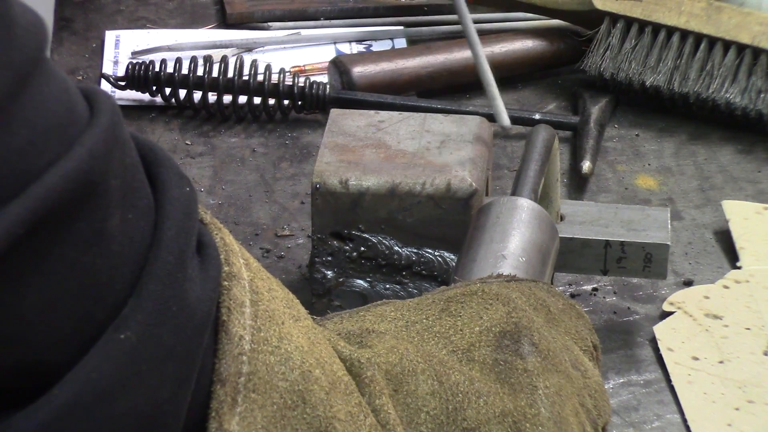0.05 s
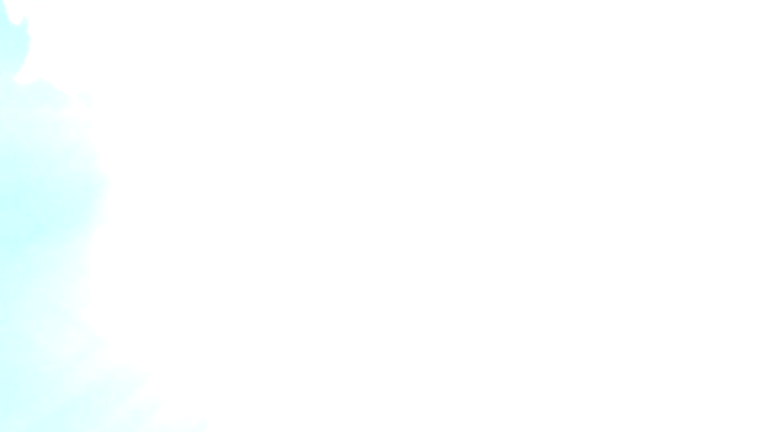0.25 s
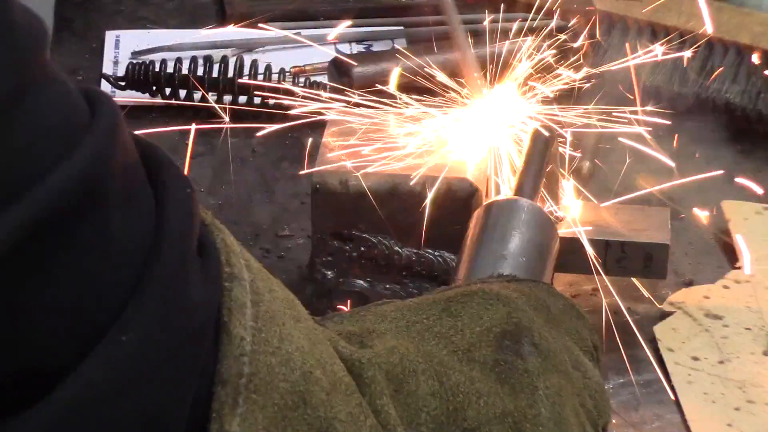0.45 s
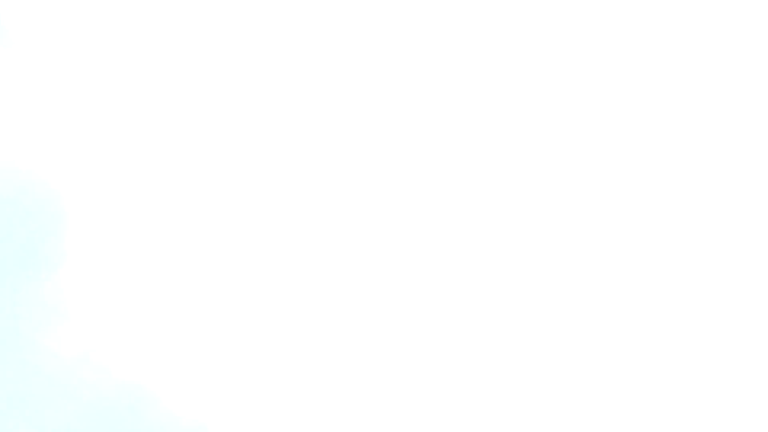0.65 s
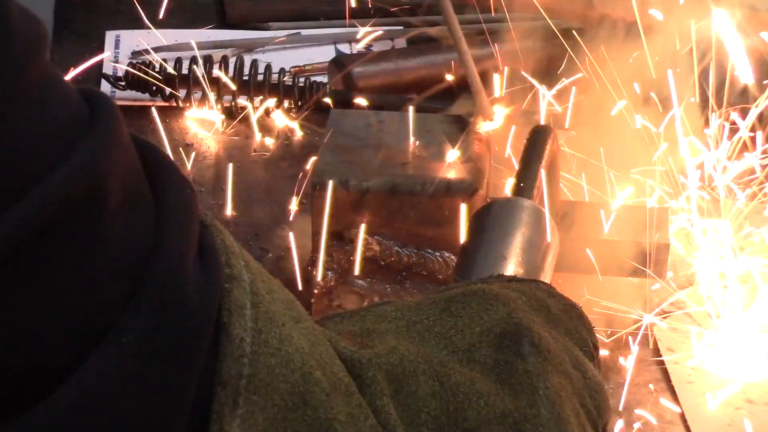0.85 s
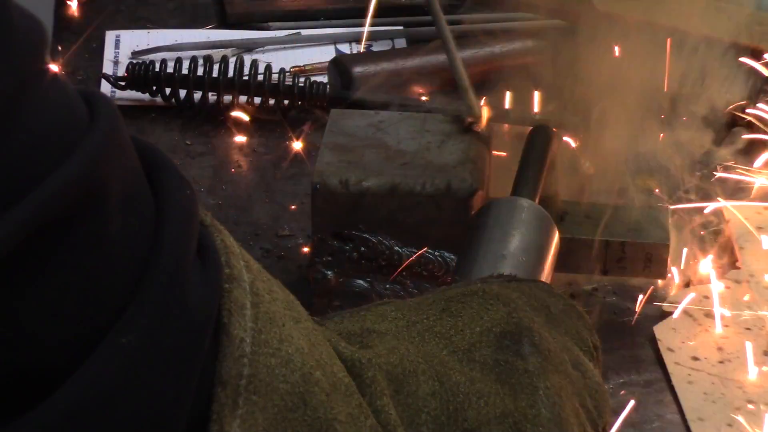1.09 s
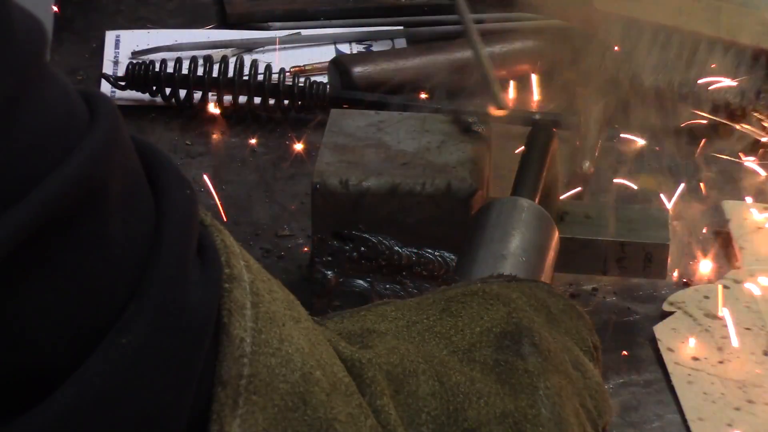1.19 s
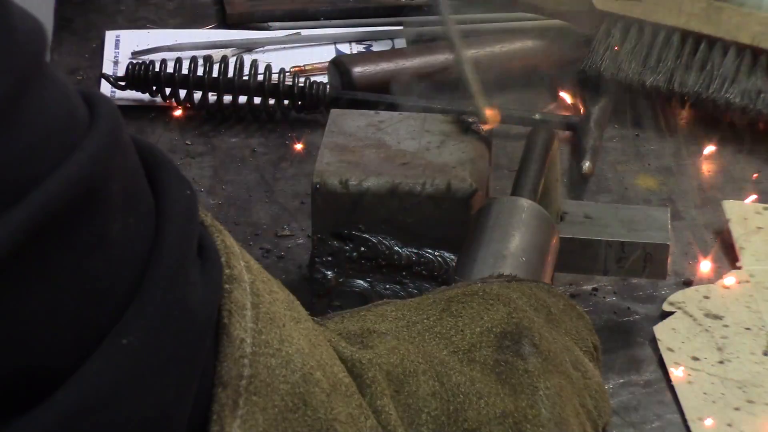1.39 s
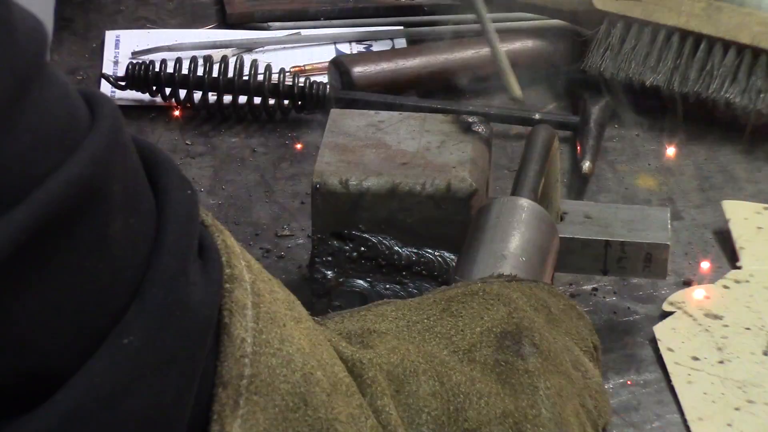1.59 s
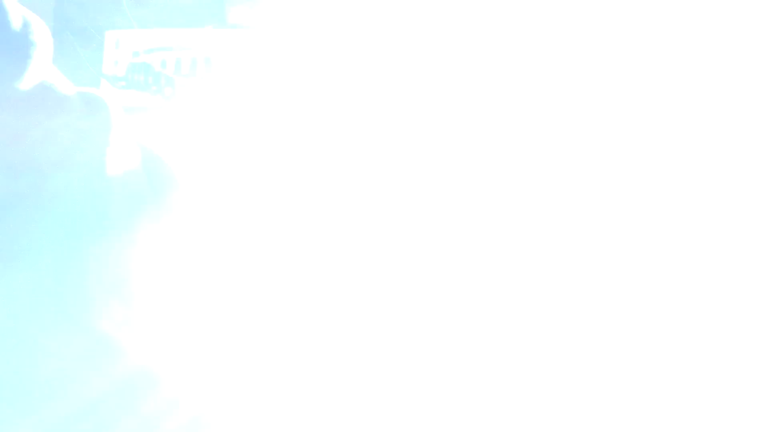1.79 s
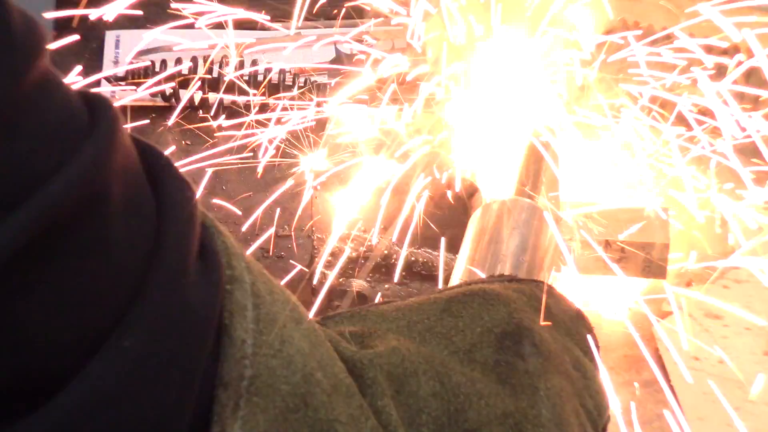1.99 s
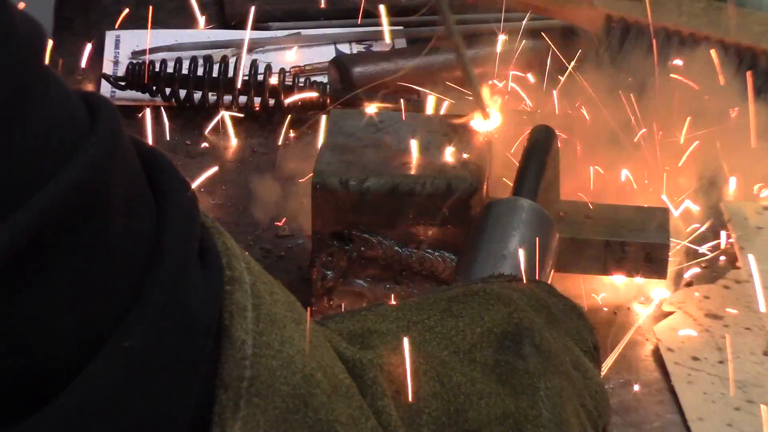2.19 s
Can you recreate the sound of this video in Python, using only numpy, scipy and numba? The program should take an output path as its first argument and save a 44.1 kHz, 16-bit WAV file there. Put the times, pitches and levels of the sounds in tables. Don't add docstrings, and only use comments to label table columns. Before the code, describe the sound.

Stick welding arc struck three times, each popping, hissing and roaring with sputter in a garage

```python
import sys
import numpy as np
from scipy import signal
from scipy.fft import rfft, irfft
from scipy.io import wavfile
from scipy.ndimage import uniform_filter1d
from numba import njit

SR = 44100
rng = np.random.default_rng(int(sys.argv[2]) if len(sys.argv) > 2 else 0)


def unload_audio(sound):
    columns = np.transpose(np.atleast_2d(sound))
    steps = np.round(np.clip(columns, -1, 1) * 32767)
    wavfile.write(sys.argv[1], SR, steps.astype(np.int16))


def magnitude_from_level(level_db):
    exponent = np.asarray(level_db, float) / 20
    return 10 ** exponent


N = 99225

# [f/Hz, level/dB]
FAN_SPECTRUM = [(15, -34), (28, -15), (62, -12), (190, -16.5), (310, -13.5), (420, -9), (2840, -24),
                (16000, -49.5)]
# [f/Hz, width/Hz, boost/dB]
FAN_RESONANCES = [(60.4, 12, 4), (410, 30, 6.4), (510, 44, 5.1), (1000, 78, 0.59), (1985, 17, 0.6),
                  (2826, 82, 0.78), (4040, 100, 0.7)]
# [t/s, level/dB]
CAMERA_GAIN = [(0, -2.5), (.2, -2), (.3, -8), (.5, -6), (.86, -5), (.9, -15), (1.0, -10), (1.15, -2.5),
               (1.7, -1.1), (1.85, 5.5), (2.119, -5), (2.16, -16), (2.25, -8)]
# [t/s, level/dB]
BENCH_KNOCKS = [
    (.96, -53),
    (1.072, -49),
    (1.0965, -34),
    (1.0985, -39),
    (1.111, -38),
    (1.492, -37),
    (1.507, -38.5),
    (1.548, -49),
]
# [f/Hz, level/dB, t60/s]
BENCH_TOP_MODES = [(67.4, -9, 0.18), (127, -7, 0.18), (184.5, 1, 0.071), (276, -2.5, 0.044),
                   (520, -2, 0.02), (950, -4.5, .012), (1490, -6.5, 0.013), (2120, -15, .015)]
# [t/s, level/dB]
SLAG_TICKS = [
    (1.0725, -31.5),
    (1.0738, -39),
]
# [f/Hz, level/dB, t60/s]
SLAG_MODES = [(2880, -6, 0.011), (4300, -1.5, 0.022), (4900, 2, 0.0054), (5940, -11, 0.02),
              (8600, -21, 0.0054), (13000, -23, .008)]
# [t/s, level/dB]
CONTACT_SPARKS = [
    (0.196, -31),
    (0.201, -33),
    (0.2009, -26),
    (0.2028, -25),
    (0.513, -36),
    (.5157, -32),
    (0.518, -42),
    (1.724, -45),
]
# [t/s, pop level/dB, heave level/dB]
ARC_POPS = [
    (.207, -12, -20),
    (.529, -20, -27),
    (0.6743, -13.5, -31),
    (1.742, -7, -23.5),
    (1.9365, -8.5, -30),
]
# [f/Hz, level/dB, t60/s]
POP_MODES = [(512, 0, 0.048), (330, -5, .02), (720, -5, .015), (1000, -9, .012), (2300, -12, .02)]
HEAVE_MODES = [(21.4, 0, 0.2), (60, -2, .06), (150, 3, .035)]
# [t/s, level/dB, hiss share/dB (high while the arc is short), roar pitch f/Hz]
ARC_COURSES = [
    [(.205, -19.5, -4, 885), (.222, -21.5, -1.3, 1000), (.238, -10.5, -3, 1070), (.256, -13.5, -18, 990),
     (.275, -12, -18.5, 704), (.318, -13, -19, 530), (.352, -12, -22, 490), (.374, -17.5, -15.5, 690),
     (.395, -26.5, -11, 620)],
    [(.527, -24.5, -4.5, 1240), (.555, -22, -6, 1300), (.585, -18, -8, 1110), (.6, -13.5, -9, 770),
     (.62, -12, -11.5, 704), (.645, -11.5, -13, 583), (.678, -17, -11.5, 520)],
    [(1.741, -13, -15.5, 690), (1.755, -20, -6.5, 740), (1.785, -31, -2.5, 900), (1.818, -17.5, -5, 1750),
     (1.85, -16, -7.5, 1000), (1.88, -14.5, -10, 596), (1.937, -15.5, -12.5, 546),
     (1.943, -15.5, -41, 1200), (1.98, -21.5, -12, 1340)],
]
# [f/Hz, level/dB]
ROAR_SPECTRUM = [(20, -15.5), (60, -17), (180, -18), (320, -12.5), (500, -9.5), (1000, -16.5),
                 (2000, -22.5), (4000, -45)]
# [f/Hz, level/dB]
HISS_SPECTRUM = [(600, -29), (1200, -6.5), (2000, -2.5), (3000, -5.5), (4420, -3.5), (8570, -12.5),
                 (10500, -11), (16000, -25)]
# [f/Hz, width/Hz, boost/dB]
BLOCK_RESONANCES = [(282, 24, -8), (370, 21, -9.5), (409, 21, -7), (496, 37, 2.5), (604, 32, -2.5),
                    (790, 17, -2), (1045, 48, -4.5), (1153, 23, -8), (1303, 18, 10), (1665, 24, 6),
                    (1890, 49, -1.5), (2910, 64, -5), (3425, 30, 1), (4500, 33, -1)]

FAN_DB = -40
SPUTTER_PER_S, SPUTTER_SPREAD_DB, SPUTTER_DB, FLICKER_DB = 450, 3.5, -3.5, 0.53
HOWL_DB, HOWL_WIDTH = 1, 0.63
HISS_EDGE_DB = 1.37
SLAP_S, SLAP_DB = 0.046, -12
EARLY_DB, EARLY_T60_S, LATE_DB, LATE_END_S = -3.5, 0.62, -34.5, 0.187
ROOM_LOW_HZ, DULL_HZ, POP_SEND_DB = 252, 6500, -3
MIC_HISS_DB, RUMBLE_CUT_HZ, TOP_HZ = -64.5, 10.5, 15650


@njit
def svf(x, hz, width):
    y, band, low = np.empty(len(x)), 0., 0.
    for i in range(len(x)):
        g = np.tan(np.pi * hz[i] / SR)
        k = width[i] / hz[i]
        v = (band + g * (x[i] - low)) / (1 + g * (g + k))
        band = 2 * v - band
        low += 2 * g * v
        y[i] = k * v
    return y


def unit(x):
    return x / np.sqrt(np.mean(x ** 2))


def colour(x, spectrum, resonances=()):
    hz = np.fft.rfftfreq(N, 1 / SR) + 1
    points = np.array(spectrum)
    gain = magnitude_from_level(np.interp(np.log(hz), np.log(points[:, 0]), points[:, 1]))
    hump = 1 + sum(magnitude_from_level(db) / (1 + (2 * (hz - f) / w) ** 2) for f, w, db in resonances)
    return unit(irfft(rfft(x) * gain * hump, N))


def walk(rate):
    k = int(SR / rate)
    levels = np.repeat(rng.standard_normal(N), k)[:N]
    return 1.58 * uniform_filter1d(uniform_filter1d(levels, k), k)


def ring(blows, modes):
    out, t = np.zeros(N), np.arange(N) / SR
    for start, db in blows:
        u = np.maximum(t - start, 0)
        out += magnitude_from_level(db) * sum(magnitude_from_level(g - 60 * u / t60) * np.sin(2 * np.pi * f * u) for f, g, t60 in modes)
    return out


def even(envelope):
    h = envelope * rng.standard_normal(len(envelope))
    for _ in range(12):
        h = irfft(np.exp(1j * np.angle(rfft(h))), len(h))
        h = h * envelope / np.sqrt(uniform_filter1d(h ** 2, size=200) + 1e-18)
    return h / np.sqrt(np.sum(h ** 2))


def fan():
    g = np.array(CAMERA_GAIN)
    hum = colour(rng.standard_normal(N), FAN_SPECTRUM, FAN_RESONANCES)
    gain_db = np.interp(np.arange(N) / SR, g[:, 0], g[:, 1])
    return hum * magnitude_from_level(FAN_DB + .5 * walk(40.06) + gain_db)


def garage(x):
    t = np.arange(int(.25 * SR)) / SR
    crossings_db = uniform_filter1d(SLAP_DB * np.floor(t / SLAP_S), size=150)
    early = magnitude_from_level(crossings_db - 60 * t / EARLY_T60_S) * (t > .002)
    late = np.clip((LATE_END_S - t) / 0.0099, 0, 1)
    h = magnitude_from_level(EARLY_DB) * even(early) + magnitude_from_level(LATE_DB) * even(late)
    h = signal.sosfilt(signal.butter(2, ROOM_LOW_HZ, "high", fs=SR, output="sos"), h)
    a = np.exp(-2 * np.pi * DULL_HZ / SR)
    return x + signal.lfilter([1 - a], [1, -a], signal.fftconvolve(x, h)[:N])


def knocks():
    return ring(BENCH_KNOCKS, BENCH_TOP_MODES)


def slag_ticks():
    return ring(SLAG_TICKS, SLAG_MODES)


def sparks():
    t = np.arange(N) / SR
    noise = signal.lfilter([1], [1, -.6], rng.standard_normal(N))
    t60 = 0.0051
    return noise * sum(magnitude_from_level(db - 60 * np.maximum(t - s, 0) / t60) * (t >= s) for s, db in CONTACT_SPARKS)


def pops():
    return ring([(s, pop_db) for s, pop_db, _ in ARC_POPS], POP_MODES)


def heaves():
    return ring([(s, heave_db) for s, _, heave_db in ARC_POPS], HEAVE_MODES)


def arc():
    t = np.arange(N) / SR
    level, share, hz = np.zeros(N), np.full(N, -20.), np.full(N, 500.)
    for rows in map(np.array, ARC_COURSES):
        time = rows[:, 0]
        on = (t >= time[0]) & (t < time[-1])
        level[on] = magnitude_from_level(np.interp(t[on], time, rows[:, 1]))
        share[on] = np.clip(np.interp(t[on], time, rows[:, 2]), -40, -.3)
        hz[on] = np.interp(t[on], time, rows[:, 3])
    hz = hz * 2 ** (0.063 * walk(45))
    level = uniform_filter1d(level, size=110)

    chance, sign, size = rng.random((3, N))
    spits = (chance < SPUTTER_PER_S / SR) * np.sign(sign - .5)
    spits = spits * magnitude_from_level(-SPUTTER_SPREAD_DB * np.log(size + 0.017))
    gas = rng.standard_normal(N) + magnitude_from_level(SPUTTER_DB) * unit(spits)

    howl = svf(svf(gas, hz, HOWL_WIDTH * hz * hz / 550), hz, 2.8 * hz)
    howl = howl * (550 / hz) ** 1.82
    roar = colour(gas, ROAR_SPECTRUM) + magnitude_from_level(HOWL_DB) * unit(howl)
    roar = colour(roar, [(20, 0), (16000, 0)], BLOCK_RESONANCES)

    hiss = colour(rng.standard_normal(N) + magnitude_from_level(-19.5) * unit(spits), HISS_SPECTRUM, BLOCK_RESONANCES)
    edge = svf(hiss, np.full(N, 11500.), np.full(N, 8000.))
    edge = edge * (magnitude_from_level(HISS_EDGE_DB * (share + 7.5)) - 1)

    roar = np.sqrt(1 - magnitude_from_level(share) ** 2) * roar * magnitude_from_level(FLICKER_DB * walk(90))
    hiss = magnitude_from_level(share + 1.27 * walk(150)) * (hiss + edge)
    return level * (roar + hiss)


def scene():
    pop, send = pops(), magnitude_from_level(POP_SEND_DB)
    wet = garage(arc() + send * pop + knocks())
    close = (1 - send) * pop + heaves() + sparks() + slag_ticks()
    return (wet + close + fan())[None]


def top_cut(x):
    return signal.sosfilt(signal.butter(12, 16500, fs=SR, output="sos"), x)


def record(dry):
    hiss = signal.lfilter([1], [1, -.3], rng.standard_normal(dry.shape))
    x = dry + magnitude_from_level(MIC_HISS_DB) * hiss
    x = signal.sosfilt(signal.butter(2, RUMBLE_CUT_HZ, "high", fs=SR, output="sos"), x)
    x = np.tanh(1.353 * x) / 1.214
    x = signal.sosfilt(signal.ellip(8, .2, 60, TOP_HZ, fs=SR, output="sos"), x)
    return top_cut(x)


dry = scene()
out = record(dry)
unload_audio(out)
```